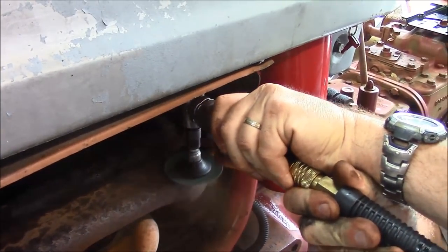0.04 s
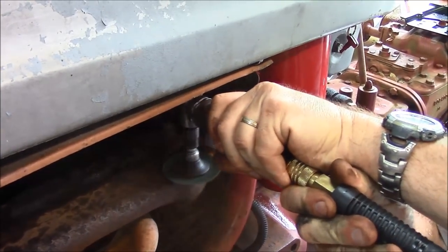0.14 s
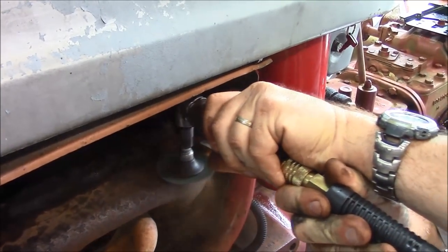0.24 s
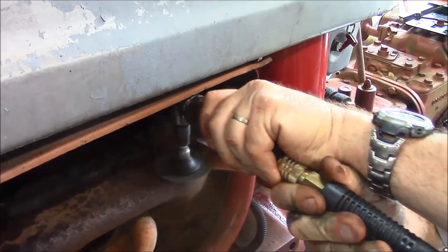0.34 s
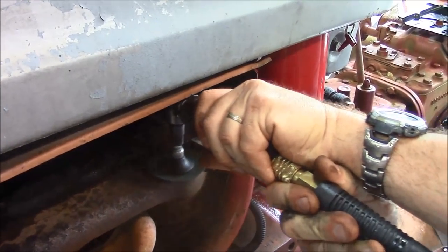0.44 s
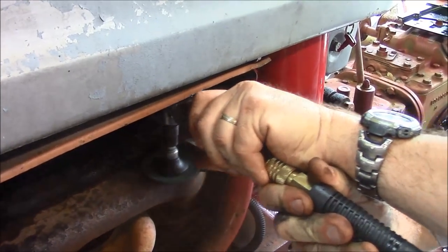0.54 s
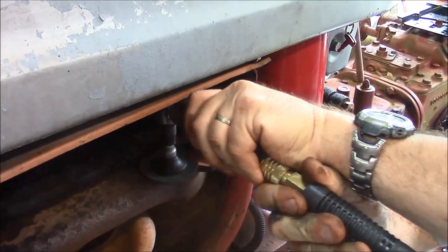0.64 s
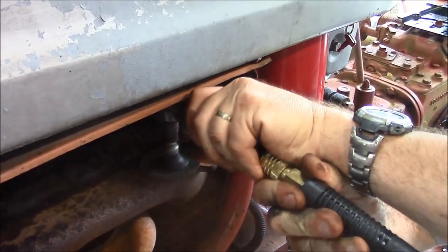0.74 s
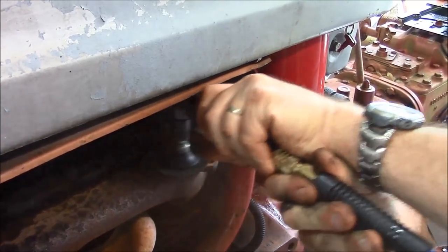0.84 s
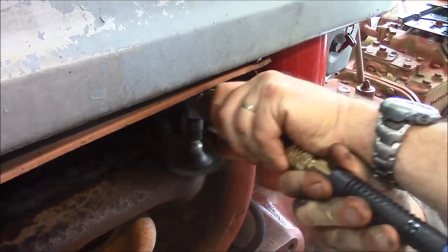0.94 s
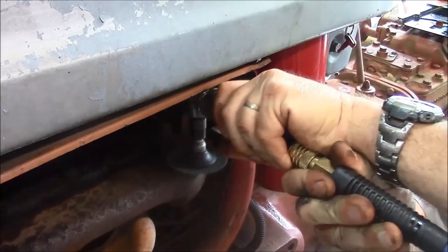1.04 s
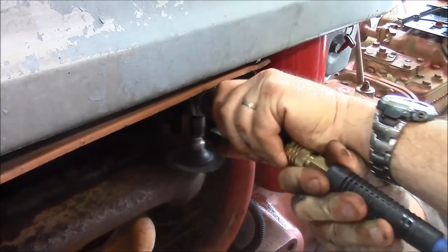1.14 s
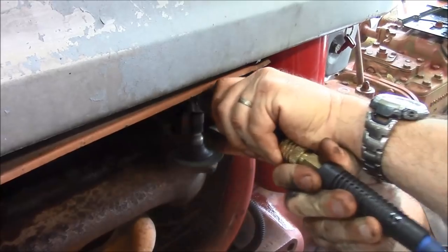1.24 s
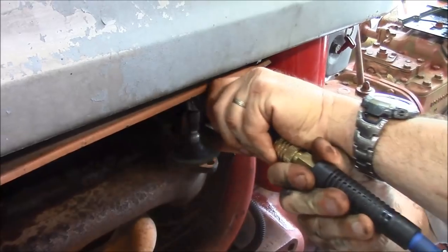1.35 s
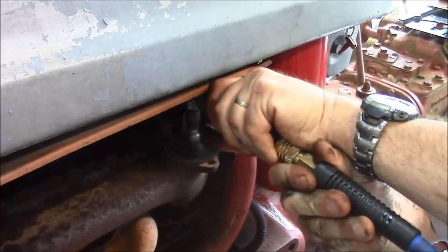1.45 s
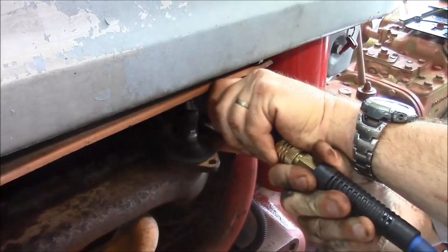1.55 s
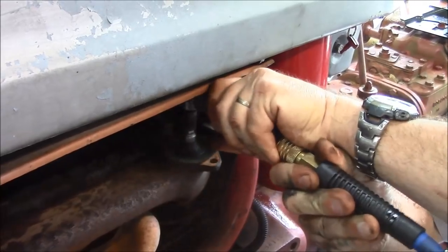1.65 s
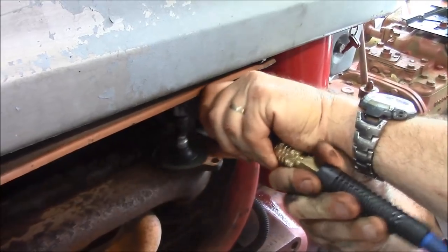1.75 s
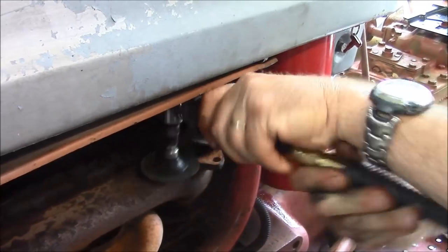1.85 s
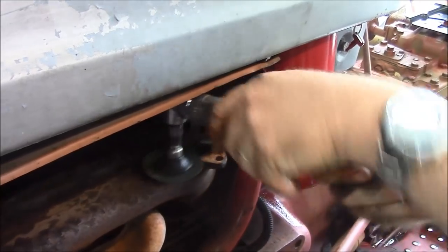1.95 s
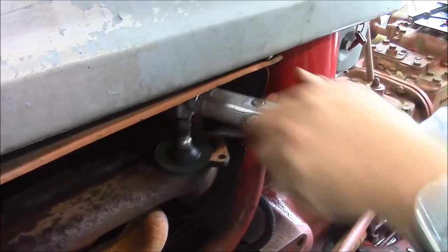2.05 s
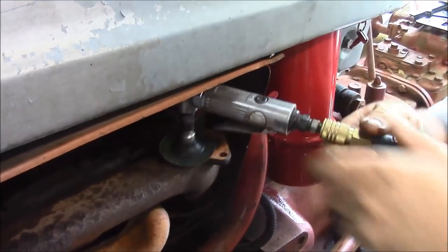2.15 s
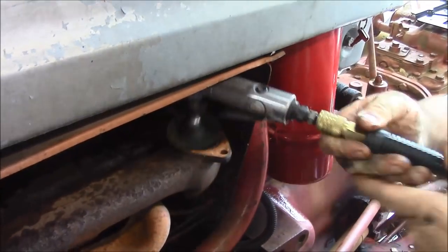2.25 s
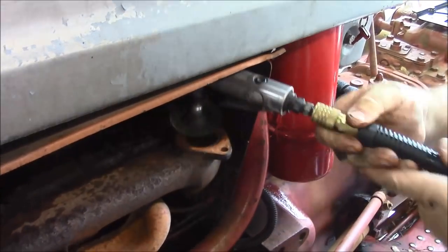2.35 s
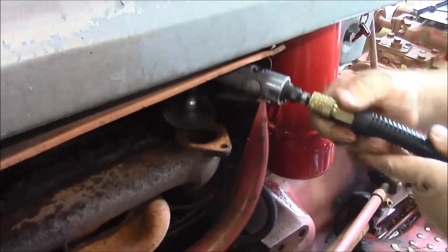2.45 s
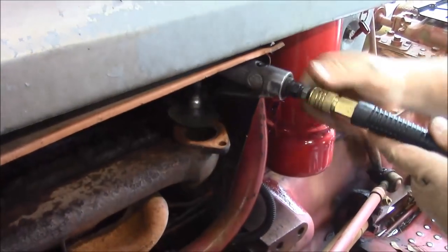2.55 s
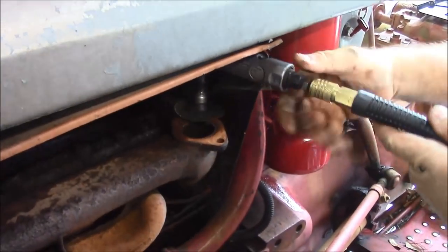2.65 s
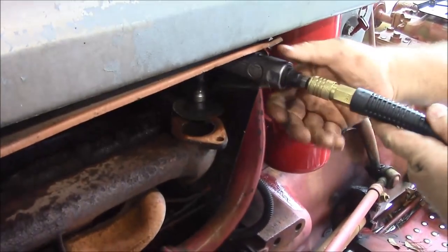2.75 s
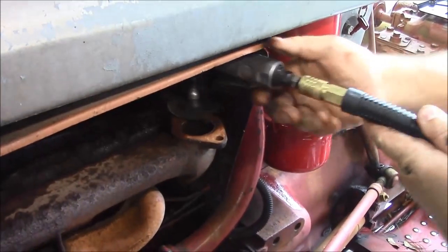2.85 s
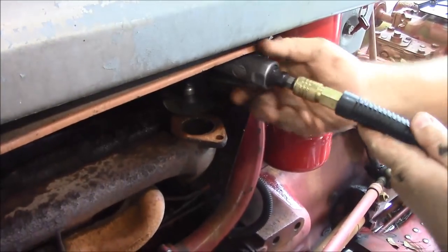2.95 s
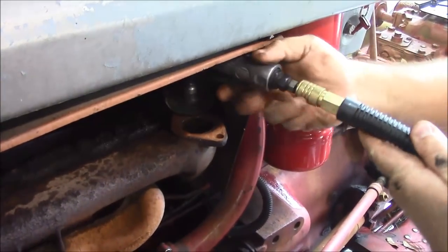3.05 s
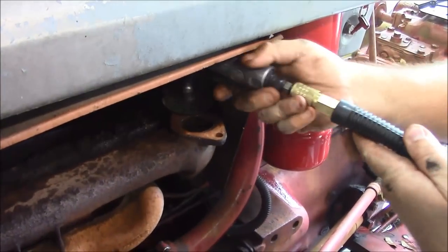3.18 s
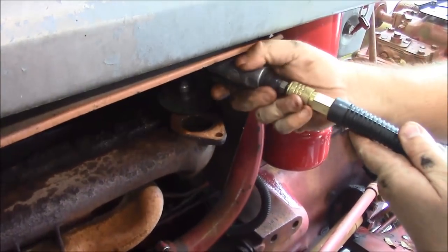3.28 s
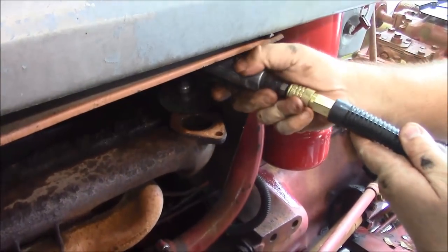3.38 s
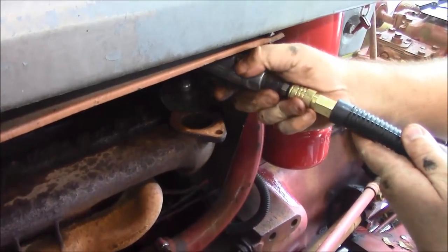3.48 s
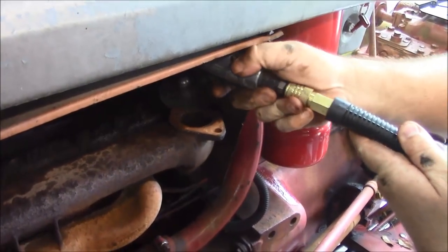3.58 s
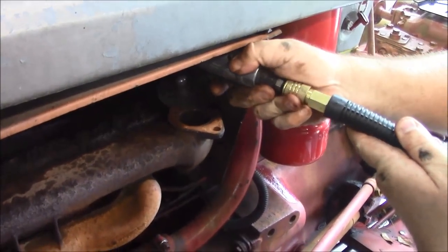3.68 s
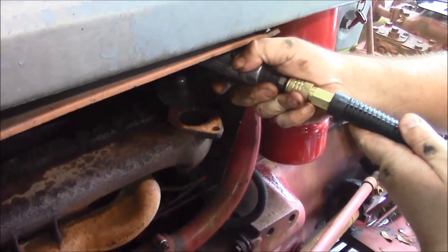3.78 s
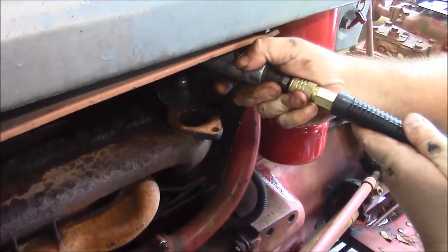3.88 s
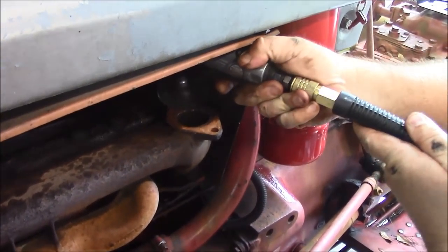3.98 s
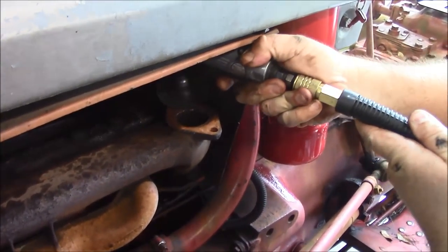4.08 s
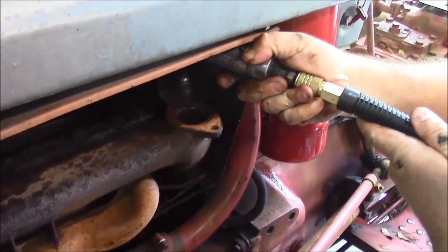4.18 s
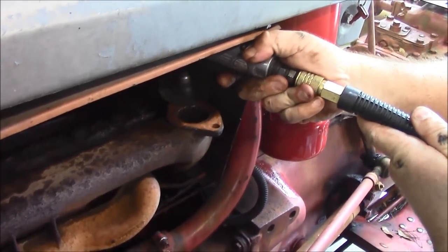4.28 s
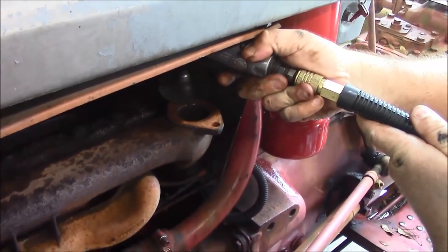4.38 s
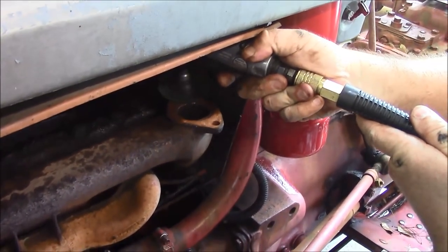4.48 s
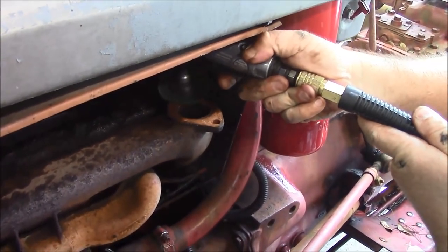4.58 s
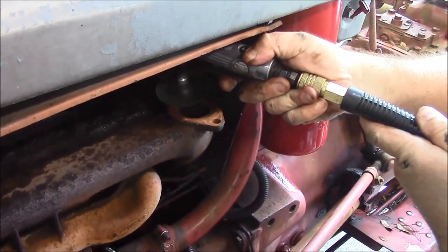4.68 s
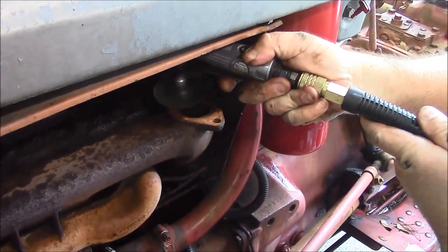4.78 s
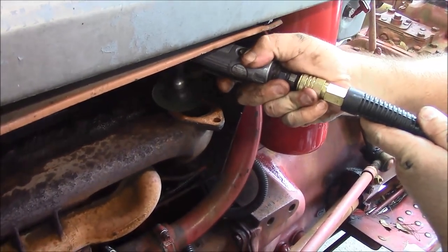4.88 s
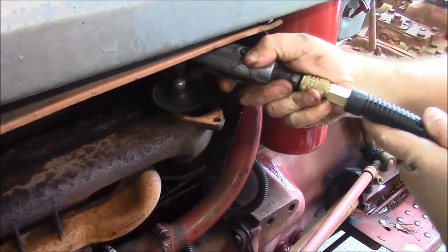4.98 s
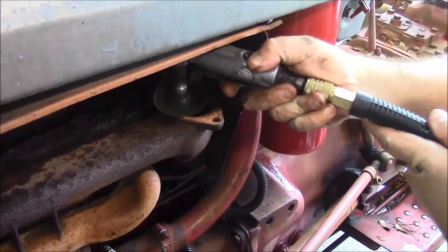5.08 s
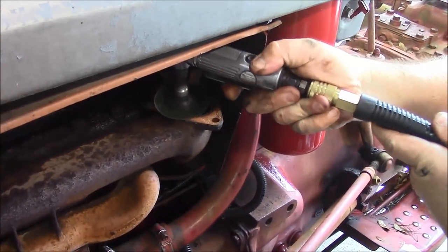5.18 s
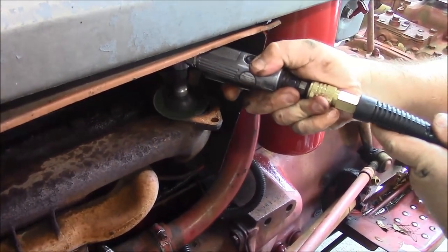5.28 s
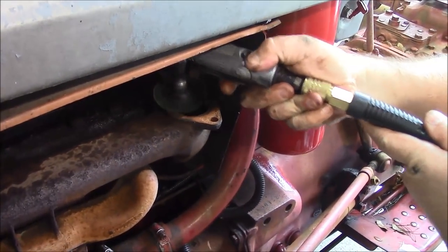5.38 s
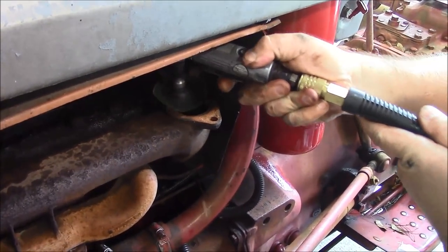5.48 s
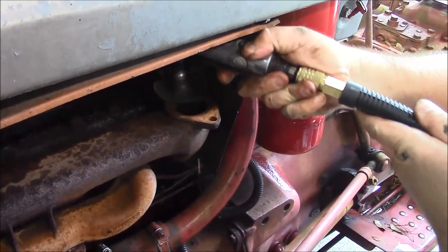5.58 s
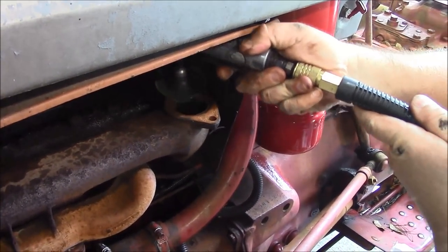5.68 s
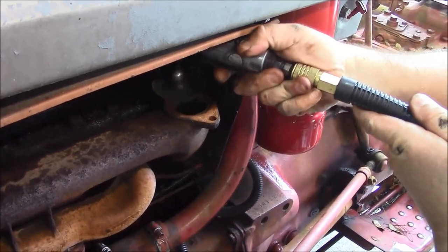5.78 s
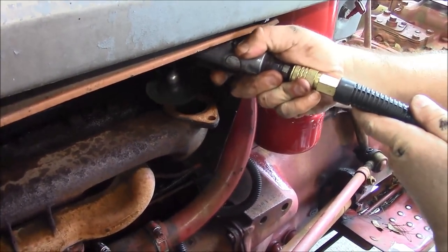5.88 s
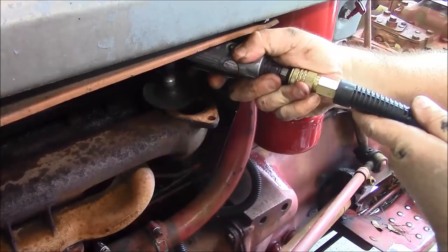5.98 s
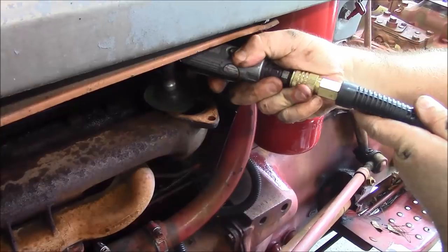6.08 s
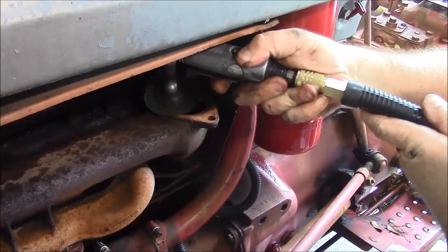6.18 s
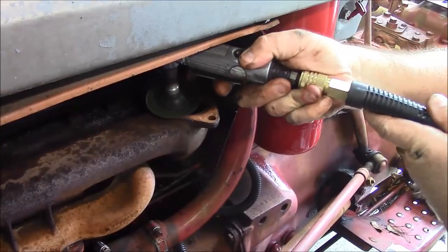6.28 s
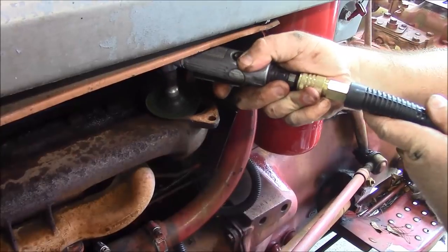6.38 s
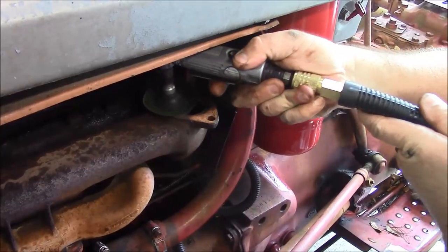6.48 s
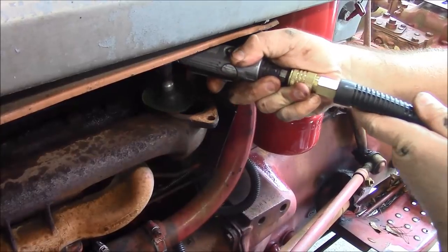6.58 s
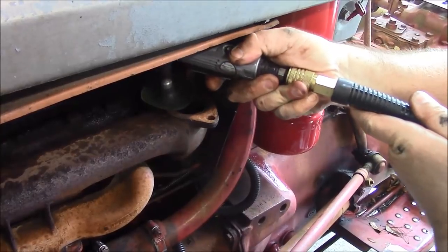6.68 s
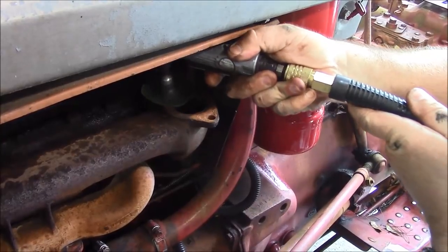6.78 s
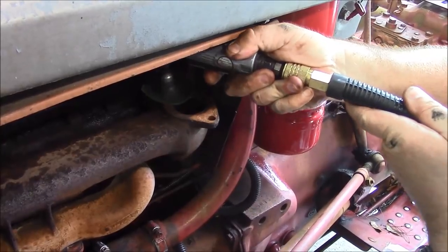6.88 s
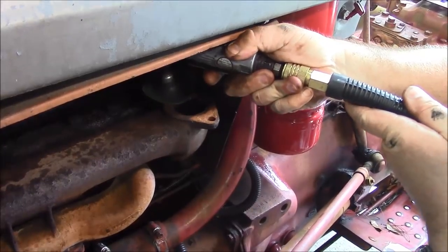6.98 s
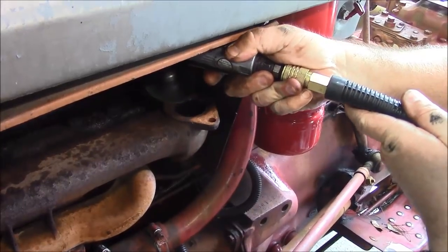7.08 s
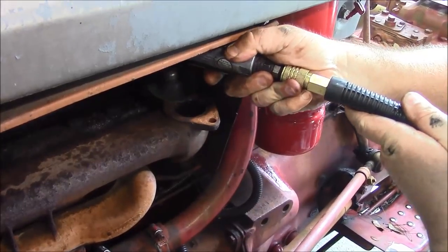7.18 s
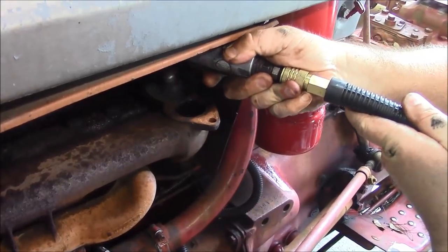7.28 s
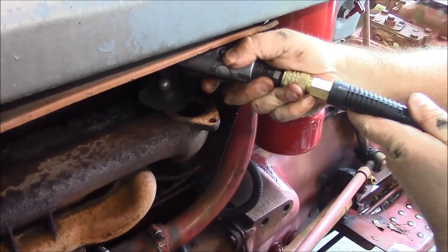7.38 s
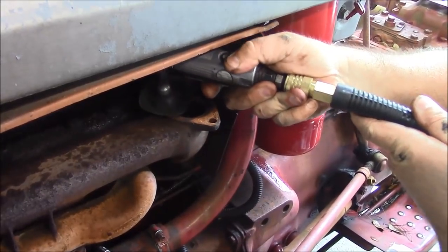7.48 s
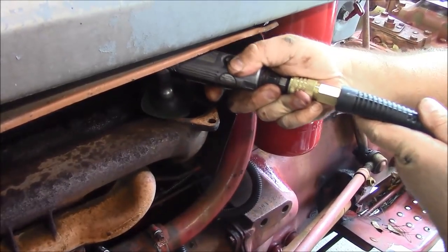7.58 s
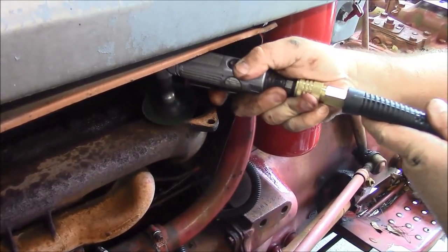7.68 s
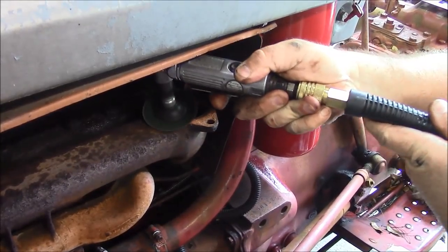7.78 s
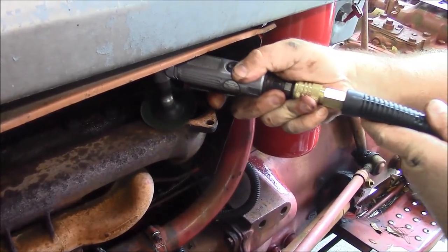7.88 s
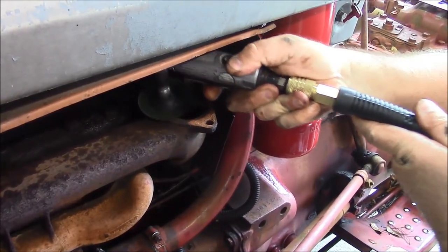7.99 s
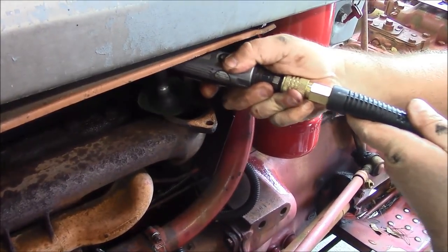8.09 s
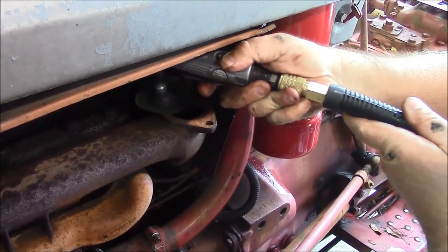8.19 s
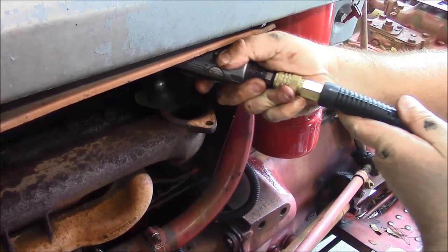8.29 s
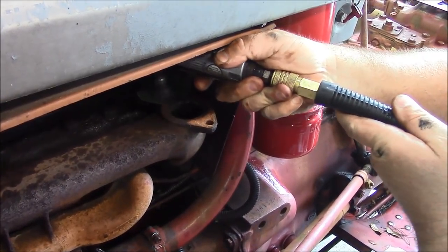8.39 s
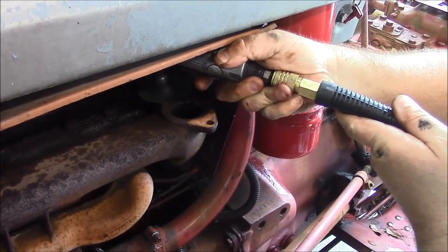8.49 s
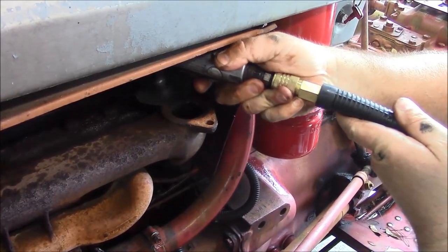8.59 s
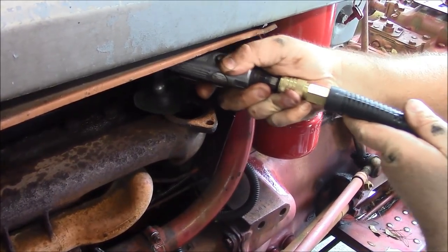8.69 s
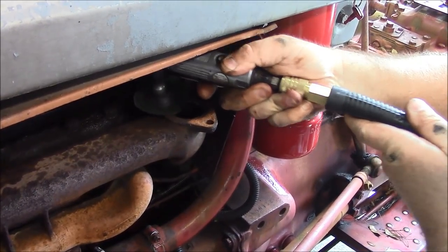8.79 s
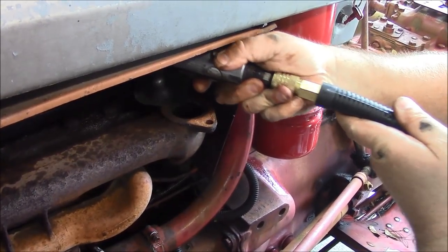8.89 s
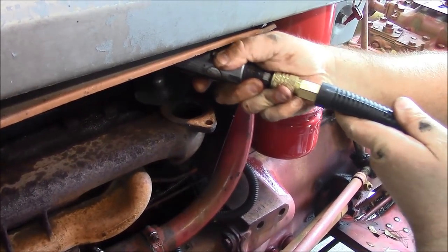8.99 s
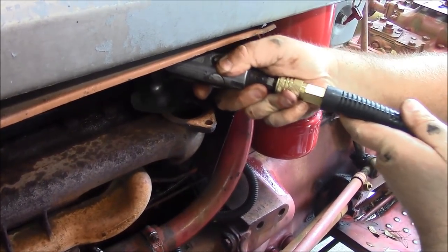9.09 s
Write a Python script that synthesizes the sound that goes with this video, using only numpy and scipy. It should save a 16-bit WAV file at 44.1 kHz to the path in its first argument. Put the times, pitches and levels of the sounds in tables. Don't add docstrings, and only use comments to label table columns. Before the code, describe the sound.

A small air grinder is already whining at the start, then shuts off and coasts down with scraping ticks. A second burst follows, fading likewise. The tool clanks against ringing metal panels while hands and hose rustle. A brief third burst leads into a long, wavering grind on iron. Close stereo microphone in a shed with short reflections.

```python
import sys
import numpy as np
from scipy import signal
from scipy.fft import rfft, irfft, next_fast_len
from scipy.io import wavfile
from scipy.ndimage import uniform_filter1d

SR = 44100
rng = np.random.default_rng(int(sys.argv[2]) if len(sys.argv) > 2 else 0)


def voltage_ratio(decibels):
    exponent = np.asarray(decibels, float) / 20
    return 10 ** exponent


def store_wav(level_fs):
    pcm = np.round(np.clip(np.atleast_2d(level_fs), -1, 1) * 32767)
    wavfile.write(sys.argv[1], SR, pcm.T.astype(np.int16))


N = 403074
GEAR = .194

# valve shuts in seconds, one bite of the disc in seconds,
# lower rub in relative dB, casting rumble in relative dB, rumble change per octave of speed in dB.
COASTS = [
    (0.144, .386, -6, -12.5, 3.5),
    (1.132, 1.428, -5.5, -11, 3),
    (4.488, 4.743, 4.5, -1.5, -4.5),
]
# start in seconds, end in seconds.
VALVE_OPEN = [
    (-.1, 0.16),
    (.549, 1.185),
    (3.8, 4.485),
    (4.815, 9.05),
]
# start in seconds, end in seconds.
HELD_FLAT = [
    (6.55, 7.7),
    (8.06, 14),
]
# start in seconds, end in seconds, vane rate it drags to in Hz,
# hum relative to the hiss in dB.
PRESSES = [(0.659, 0.664, 1314, -13), (0.774, 0.8, 1387, -11.5), (0.833, 0.892, 1370, -14),
           (0.938, 0.959, 1375, -14), (1.039, 1.134, 1424, -20), (4.269, 4.414, 1428, -27),
           (4.889, 4.954, 1441, -10.5), (5.214, 5.225, 1500, -12.5), (5.324, 5.365, 1247, -15.5),
           (5.42, 5.454, 1261, -20), (5.449, 5.534, 1370, -19.5), (5.619, 5.665, 1348, -15),
           (5.766, 5.822, 1334, -16), (5.894, 5.974, 1330, -17.5), (6.037, 6.09, 1290, -15.5),
           (6.088, 6.131, 1350, -19.5), (6.191, 6.259, 1376, -15.5), (6.331, 6.402, 1388, -15),
           (6.451, 6.542, 1345, -17.5), (6.543, 6.718, 1360, -23.5), (6.72, 7.301, 1382, -26.5),
           (7.278, 7.69, 1371, -28), (7.716, 7.751, 1413, -29), (7.749, 7.907, 1513, -29),
           (7.924, 7.976, 1371, -25.5), (8.005, 8.048, 1237, -24), (8.046, 8.605, 1362, -29),
           (8.606, 8.831, 1366, -32), (8.786, 9.3, 1353, -29.5)]
# time in seconds, hiss in dB, vane tone in dB.
RUNS = [
    [(0.0, -13.5, -16), (.125, -14.5, -17)],
    [(.55, -10.5, -10), (.6, -14, -17.5), (.7, -16, -16), (.775, -16.5, -14.5), (.92, -18, -15),
     (1.01, -23.5, -27), (1.075, -22, -22), (1.125, -25.5, -24.5)],
    [(3.88, -84, -18), (3.92, -72, -18), (3.995, -62.5, -18), (4.035, -45, -17.5), (4.06, -18, -23),
     (4.15, -16.5, -18.5), (4.465, -17.5, -16.5)],
    [(4.825, -22.5, -19), (4.835, -16.5, -21), (4.95, -15.5, -16), (5.25, -17.5, -15), (5.5, -17, -19.5),
     (5.6, -18, -18), (6.4, -17.5, -16), (6.52, -23.5, -24), (7.3, -23.5, -28.5), (7.85, -23, -26.5),
     (9.14, -23.5, -27.5)],
]
# time in seconds, rub in dB, vane tone in dB.
RUN_DOWNS = [
    [(.175, -26.5, -16.5), (.225, -14.5, -18), (.31, -15, -16), (.46, -16.5, -30), (.53, -21.5, -40),
     (.54, -30, -46)],
    [(1.19, -30, -32.5), (1.325, -34, -41.5), (1.38, -42.5, -50), (1.415, -43, -61), (1.5, -41.5, -60.5),
     (1.555, -63.5, -60), (1.65, -63, -60.5), (1.71, -81.5, -60)],
    [(4.495, -24.5, -19.5), (4.54, -32, -22.5), (4.61, -36.5, -25.5), (4.695, -42, -36.5),
     (4.725, -43, -39), (4.8, -50, -38)],
]


def evened(x):
    return x / np.sqrt(np.mean(x ** 2) + 1e-20)


def read(points, hz):
    f, value = np.transpose(points)
    return np.interp(np.log(hz + 1), np.log(f + 1), value)


def columns(tables):
    rows = np.vstack(tables)
    rows = rows[np.argsort(rows[:, 0], kind="stable")]
    return [np.interp(np.arange(N) / SR, rows[:, 0], c) for c in rows.T[1:]]


def stepped(values, starts):
    at = np.searchsorted(starts, np.arange(N) / SR).clip(1) - 1
    return np.asarray(values, float)[at].T


def inside(spans, soft_s):
    t = np.arange(N) / SR
    return np.clip(sum(np.clip(np.minimum(t - a, b - t) / soft_s + .5, 0, 1) for a, b in spans), 0, 1)


def after(s, decay_s):
    t = np.arange(N) / SR - s
    return (t >= 0) * np.exp(-np.maximum(t, 0) / decay_s)


def wander(hz):
    steps = np.arange(N) * 2 * hz / SR
    count = int(steps[-1]) + 2
    return 0.99 * np.interp(steps, np.arange(count), rng.standard_normal(count))


def noise(spectrum, lo_hz=0, hi_hz=30000):
    # pitch in Hz, side minus mid in dB.
    apart = [(60, -27), (150, -11), (380, -18.5), (950, -10.5), (2380, -16.5), (5980, -9), (9000, -11),
             (15000, -5)]
    # pitch in Hz, left minus right in dB.
    lean_db = [(60, 0.0), (240, 0.0), (950, -1.0), (4500, -1.8), (8000, .8), (15000, 0.3)]
    size = next_fast_len(N)
    hz = np.fft.rfftfreq(size, 1 / SR)
    mid, other = rfft(rng.standard_normal((2, size)))
    side = voltage_ratio(read(apart, hz)) * other
    edges = 1 / np.sqrt((1 + (lo_hz / (hz + 1)) ** 12) * (1 + (hz / hi_hz) ** 12))
    lean = voltage_ratio(read(lean_db, hz) / 2)
    both = np.array([(mid + side) * lean, (mid - side) / lean])
    return evened(irfft(both * voltage_ratio(read(spectrum, hz)) * edges, size)[:, :N])


def handling():
    # time in seconds, low level in dB, middle level in dB, high level in dB.
    rustle = [
        (1.55, -80, -76, -82),
        (2.3, -59, -65, -72.5),
        (2.5, -63, -65, -71),
        (2.75, -63, -60, -70),
        (3.0, -65.5, -70.5, -79),
        (3.4, -71, -75, -82),
        (4.0, -74, -78.5, -82),
    ]
    # pitch in Hz, level in dB.
    shed_colour = [(18, -59), (30, -25), (125, -30.5), (180, -8), (472, -5.5), (552, 2), (794, -10.5),
                   (1480, -16.5), (9640, -25), (15000, -52.5)]
    levels = columns([rustle])
    grit = [voltage_ratio(1. * wander(8)), voltage_ratio(2.2 * wander(60)), voltage_ratio(3.5 * wander(150))]
    bands = noise(shed_colour, 230, 1200), noise(shed_colour, 1200, 4500), noise(shed_colour, 4500, 14000)
    rustling = sum(voltage_ratio(db) * g * band for db, g, band in zip(levels, grit, bands))
    return rustling + voltage_ratio(-93.5) * noise(shed_colour, hi_hz=230)


def rings():
    # start in seconds, pitch in Hz, peak in dB, time to fall 60 dB in seconds.
    panels = [(1.92, 694, -50, 0.69), (1.92, 533, -55, .3), (2.035, 1001, -43, .38), (2.035, 893, -48, .3),
              (2.045, 195, -55, .4), (2.06, 577, -54, 0.63), (2.08, 450, -54, 1.2), (2.035, 1346, -50, .34),
              (2.23, 998, -46, 0.32), (2.2303, 845, -54, .8), (2.24, 200, -58, 0.66),
              (2.24, 545, -54.5, 1.2), (2.24, 400, -58, .7), (2.6148, 595, -56, 1.2),
              (2.6148, 456, -60, 1.2), (2.731, 1050, -53.5, 0.32), (2.915, 183, -63.5, 0.6),
              (2.94, 613, -59, .7), (3.1675, 183, -60, .65), (3.167, 398, -59.5, 2.5),
              (3.1675, 548, -50, 0.85), (3.1674, 948, -52, .4), (3.1675, 1233, -57.5, .4),
              (3.484, 1284, -48, .06), (3.484, 1080, -50, .06), (3.484, 1500, -47.5, .06),
              (3.514, 1350, -55, .05), (2.735, 1350, -56, .3), (2.785, 1250, -57, .2),
              (2.846, 1100, -59, .2), (2.66, 334, -62, .8), (2.38, 215, -62, .8), (2.64, 1600, -62, .5),
              (3.059, 1620, -63, 0.53)]
    t, out = np.arange(SR // 2) / SR, np.zeros(N)
    for (s, hz, db, t60), (beat_hz, phase) in zip(panels, rng.uniform(1, 5.3, (len(panels), 2))):
        at = round(s * SR)
        pair = np.sin(2 * np.pi * hz * t) + .35 * np.sin(2 * np.pi * (hz + 4 * beat_hz) * t + phase)
        swell = 1 - np.exp(-t / 0.0066)
        fade = np.cos(np.pi * t)
        out[at:at + len(t)] += voltage_ratio(db - 60 * t / t60) * swell * fade * pair
    return out


def ticks():
    # start in seconds, peak in dB, pitch in Hz.
    taps = [(1.4625, -36, 3790), (1.797, -62, 3000), (1.818, -63, 2600), (1.846, -66, 2800),
            (2.584, -42, 4200), (2.5987, -39, 2460), (2.7838, -41, 1300), (2.819, -39.5, 5780),
            (3.0081, -50.5, 1340), (3.1674, -45, 1370), (3.488, -41, 1470), (3.519, -53, 1397)]
    t, out = np.arange(1500) / SR, np.zeros(N)
    for s, db, hz in taps:
        at = round(s * SR)
        envelope = np.exp(-t / 0.0015) * np.minimum(t * hz, 1) ** 2
        tap = np.sin(2 * np.pi * hz * t) + 0.47 * np.sin(2 * np.pi * 2.3 * hz * t)
        out[at:at + len(t)] += voltage_ratio(db) * envelope * tap
    return out


def iron_bands():
    # pitch in Hz, width in Hz, level in dB.
    iron = [(184, 14, -3), (600, 84, 11.0), (915, 33, 7), (1040, 36, 3.0), (1480, 130, -2.5),
            (2166, 52, -1), (2400, 38, -1), (2910, 40, -4.5), (3360, 57, -3.0), (4450, 56, -19),
            (5830, 120, -14.5)]
    hz = np.geomspace(100, 16000, 400)
    ring = sum(voltage_ratio(db) / np.sqrt(1 + (2 * (hz - f) / w) ** 2) for f, w, db in iron) + voltage_ratio(-29.5)
    colour = np.transpose([hz, 20 * np.log10(ring)])
    return noise(colour, 190, 1600), noise(colour, 1220, 5000), noise(colour, 4500, 11500)


def knocks():
    # start in seconds, clack peak in dB, thud in dB, tick in dB, pitch of the struck spot in Hz.
    blows = [(1.92, -23.5, -44, -45, 2146), (2.013, -47, -44, -53.5, 1490), (2.035, -22, -40, -47, 905),
             (2.0876, -40, -47.5, -47, 1510), (2.1192, -48, -59, -50.5, 902), (2.139, -50, -62, -57, 921),
             (2.2305, -27.5, -40.5, -50, 1010), (2.5158, -54, -66, -56.5, 900), (2.534, -48, -68, -54, 960),
             (2.584, -44, -68, -58, 3650), (2.615, -34.5, -53, -44, 2480), (2.709, -42, -53.5, -59, 1620),
             (2.731, -36.5, -50.5, -52.5, 1080), (2.819, -51, -57, -47.5, 1016),
             (2.8459, -51, -64, -66, 1274), (2.9479, -50, -57, -57, 3490),
             (3.059, -44.5, -71.5, -65.5, 1670), (3.1456, -46.5, -59, -70, 1500),
             (3.1675, -38, -44, -76.5, 1040), (3.2838, -55.5, -56, -70, 1604),
             (3.489, -57, -63.5, -81.5, 1500), (3.6897, -62, -59.5, -78, 1046)]
    # pitch in Hz, level in dB, time to fall 60 dB in seconds.
    tool_modes = [(1670, -4, 0.31), (2304, -15, 0.57), (2850, 2.5, 0.084), (3360, -6, 0.19),
                  (5770, -10, 0.18)]
    t = np.arange(SR // 2) / SR
    thud = (1 - np.exp(-t / 0.014)) * (voltage_ratio(-60 * t / 0.34) + 0.17 * voltage_ratio(-60 * t / 1.04))
    clack = (1 - np.exp(-t / 0.00054)) * (voltage_ratio(-60 * t / 0.11) + 0.23 * voltage_ratio(-60 * t / 0.48))
    tick = voltage_ratio(-60 * t / .06) + 0.11 * voltage_ratio(-60 * t / .4)
    power, ring = np.zeros((3, N + len(t))), np.zeros(N + len(t))
    struck = rng.uniform(-1, 1, (len(blows), len(tool_modes)))
    for (s, peak_db, thud_db, tick_db, hz), where in zip(blows, struck):
        clack_db, thud_db = peak_db - 14.5, thud_db - 3
        at = round(s * SR)
        levels = voltage_ratio(np.array([[thud_db], [clack_db], [tick_db]]))
        power[:, at:at + len(t)] += (levels * [thud, clack, tick]) ** 2
        modes = sum(w * voltage_ratio(db - 60 * t / min(t60, .35)) * np.sin(2 * np.pi * f * t)
                    for w, (f, db, t60) in zip(where, tool_modes))
        spot = voltage_ratio(-60 * t / 0.098) * np.sin(2 * np.pi * hz * t)
        ring[at:at + len(t)] += voltage_ratio(clack_db) * (voltage_ratio(-5.5) * modes + voltage_ratio(3.0) * spot)
    return ring[:N] + sum(np.sqrt(p[:N]) * band for p, band in zip(power, iron_bands()))


def thrum():
    # pitch in Hz, level in dB.
    shudder_colour = [(250, -39.5), (340, -11.5), (375, 2.5), (420, -8.5), (460, -4.5), (600, -40)]
    shudder_db = [-35, -47, -46]
    decay_s = 0.14
    swell = sum(voltage_ratio(db) * (after(c[0], decay_s) - after(c[0], .3 * decay_s)) for c, db in zip(COASTS, shudder_db))
    return 2 * swell * noise(shudder_colour) * inside([(0, 1.75), (4, 4.8)], .1)


def vane_rate():
    # valve opens in seconds, shuts in seconds, free vane rate in Hz, coasting time constant
    # in seconds, rate it coasts toward in Hz.
    bursts = [
        (-.016, .145, 1580, .13, 71.94),
        (.551, 1.128, 1536, 0.126, 72.1),
        (4.054, 4.481, 1528, .12, 249.4),
        (4.82, 9.3, 1585, .15, 72),
    ]
    spin_up_s, creep_hz, settle_s, step_s = .0685, 72, .4, .002
    t = np.arange(-50, N / SR / step_s + 2) * step_s

    def gate(a, b):
        return np.clip(np.minimum(t - a, b - t) / (2 * step_s) + .5, 0, 1)

    goal, pace, air = creep_hz + 0 * t, 0 * t, 0 * t
    for opens, shuts, free_hz, coast_s, idle_hz in bursts:
        goal += gate(opens, min(shuts + settle_s, t[-1])) * (idle_hz - goal)
        pace += gate(opens, np.inf) * (1 / coast_s - pace)
        pace += gate(opens, shuts) * (1 / spin_up_s - pace)
        goal += gate(opens, shuts) * (free_hz - goal)
        air += gate(opens, shuts)
    for start, end, drag_hz, *_ in PRESSES:
        goal += gate(start, end) * (air > .5) * (drag_hz - goal)
    hz = [creep_hz]
    for pull, share in zip(goal.tolist(), (1 - np.exp(-pace * step_s)).tolist()):
        hz.append(hz[-1] + (pull - hz[-1]) * share)
    return np.interp(np.arange(N) / SR, t, hz[1:])


def disc_beat(hz):
    turns = np.cumsum(hz * GEAR) / SR
    for shut_s, bite_s, *_ in COASTS:
        turns[round(shut_s * SR):] -= turns[round(bite_s * SR)]
    bite = np.cos(2 * np.pi * turns) + .5 * np.cos(4 * np.pi * turns - .8) + 0.95 * wander(90)
    touching = 1 - .7 * inside([(1.1, 1.35), (4.4, 4.9)], .02)
    return bite * touching * np.clip(1.2 - hz / 800, .1, .85) * np.clip((hz - 120) / 70, .3, 1)


def bites(hz):
    # start in seconds, end in seconds.
    biting = [
        (.285, .545),
        (1.348, 1.53),
    ]
    between_db = [-10, -10.5]
    # time in seconds, level over the rub in dB, width in seconds.
    catches = [(0.292, 3, .003), (.3029, 1, .003), (.3147, 2, 0.0028), (0.3267, 3, 0.0028),
               (.339, 1, 0.0034), (.3529, 2, 0.0027), (.3677, 1.5, .003), (.3847, 2, 0.0038),
               (0.394, -4, 0.0026), (.4047, 2, 0.0029), (.414, -3.5, 0.0024), (.426, 3.5, 0.0043),
               (.438, -5, 0.0037), (0.45, 3, 0.005), (0.4648, -5.5, 0.0024), (0.4764, 0.1, 0.0036),
               (0.4849, 1, .004), (.502, -.5, .004), (0.514, -0.5, .004), (.522, -1.5, 0.0053),
               (0.53, -3, 0.0026), (1.358, 3, 0.0028), (1.368, -3, .003), (1.3782, 4, 0.0026),
               (1.3867, -3.5, .003), (1.4016, 4, .004), (1.4124, 1.5, .004), (1.4302, 5, 0.0043),
               (1.444, -4, 0.0025), (1.4641, 5, 0.0045), (1.4819, 2, .004), (1.4914, -1.5, 0.0036),
               (1.4998, -.5, .005), (1.511, -1.5, .005), (1.524, -3, .01)]
    t, slow = np.arange(N) / SR, inside(biting, 0.0065)
    catch = voltage_ratio(stepped(between_db, [a for a, _ in biting]))
    for s, db, width_s in catches:
        near = slice(round(s * SR) - 1500, round(s * SR) + 1500)
        catch[near] += voltage_ratio(db) * np.exp(-((t[near] - s) / width_s) ** 2)
    return (1 - slow) * voltage_ratio(6.9 * disc_beat(hz) - 2.5) + slow * catch


def colours(hz):
    linger_db = [10, 3.5, 3]
    bed_db = [.1, 0.058, .1, -2]
    linger_s = 0.037
    t = np.arange(N) / SR
    lower_db = np.full(N, -2.5)
    rumble_db = -15 + stepped(bed_db, [a for a, _ in VALVE_OPEN])
    rumble_db = rumble_db - 10 * inside([(6.6, 14)], 0.42)
    for (shut_s, _, low_db, deep_db, slope_db), hang_db, (opens, _) in zip(COASTS, linger_db, VALVE_OPEN[1:]):
        on = inside([(shut_s + 0.023, opens)], 0.02)
        hang = hang_db * np.exp(-((t - shut_s - linger_s) / linger_s) ** 2)
        lower_db += on * (low_db + hang - lower_db)
        coasting_db = deep_db + slope_db * np.log2(np.maximum(hz, 150) / 500)
        rumble_db += on * (coasting_db + hang - rumble_db)
    return lower_db, rumble_db


def hiss(hz):
    # pitch in Hz, level in dB.
    air_colour = [(1000, -47.5), (1700, -16.5), (2190, -3), (2610, -3), (2710, -3), (3000, -5),
                  (3480, -1.5), (4600, -4.5), (5640, -5.5), (6430, -11), (6990, -7), (9680, -6.5),
                  (13900, -17), (14700, -26), (15700, -42.5)]
    rub_colour = [(1000, -53.5), (1700, -27), (2090, -7), (2440, -8.5), (3080, -4), (3640, -2), (4470, -6),
                  (5750, -7), (6310, -4.5), (10600, -5), (15700, -27.5)]
    rumble_colour = [(20, -42), (150, -41.5), (290, -27.5), (375, -9.5), (410, -17.5), (460, -9),
                     (700, -11), (1200, -2), (1700, -3.5), (2200, -23.5), (4000, -83)]
    slow_rub_colour = [(1000, -50), (1800, -24), (2200, -12.5), (2600, -9.5), (3000, -2), (3600, -2.5),
                       (4200, -9.5), (4700, -6.5), (5500, -8.5)]
    grind_colour = [(2600, -30.5), (3200, -5), (3600, 0.6), (4000, -5), (4800, -30)]
    # start in seconds, end in seconds.
    crawling = [
        (.39, .6),
        (1.4, 1.43),
    ]
    high_db = columns(RUNS + RUN_DOWNS)[0]
    lower_db, rumble_db = colours(hz)
    air = inside(VALVE_OPEN, 0.017)
    chop = 1 + 0.069 * np.cos(2 * np.pi * np.cumsum(hz) / SR)
    jet = noise(air_colour, lo_hz=5360) + voltage_ratio(lower_db) * noise(air_colour, hi_hz=4860)
    jet = jet + voltage_ratio(-12) * inside(HELD_FLAT, .1) * noise(grind_colour)
    slow = inside(crawling, 0.087)
    lower = np.sqrt(1 - slow) * noise(rub_colour, hi_hz=4760)
    lower = lower + np.sqrt(slow) * voltage_ratio(1.0) * noise(slow_rub_colour, hi_hz=5200)
    rub = noise(rub_colour, lo_hz=4900) + voltage_ratio(lower_db) * lower
    rumble = voltage_ratio(rumble_db + 0.71 * wander(4.3)) * noise(rumble_colour)
    mix = np.sqrt(air) * jet * chop * voltage_ratio(.6 * wander(30))
    mix = mix + np.sqrt(1 - air) * rub * bites(hz) + rumble
    return voltage_ratio(high_db) * mix * inside([(-.1, 1.76), (3.89, 9.3)], .03)


def tone_levels(hz):
    # pitch in Hz, level in dB.
    vane_colour = [(230, -22.5), (400, -14), (550, -6), (750, -2), (950, 0), (1150, -1), (1300, -1),
                   (1500, 0)]
    octave_db = [-3, 0, -3, -5]
    edges_db = [-3, 3, 3, 1, 0, -0.7, -2, 3, -1, -3, -4.5, -1.5, -0.3, -1.5, -1.5, -4, 2.5, 3.5, 0.5, -1.5,
                0.4, 1, .1, 3, 5, 2.5, .1, 2.5, -0.5]
    hiss_db, tone_db = columns(RUNS + RUN_DOWNS)
    hum_db, tilt_db = np.full(N, -26.5), np.zeros(N)
    for (start, end, _, db), edge_db in zip(PRESSES, edges_db):
        on = inside([(start - .008, end)], .03)
        hum_db += on * (db - hum_db)
        tilt_db += on * (edge_db - tilt_db)
    bark_db = 10 * sum(after(c[0], 0.033) for c in COASTS)
    air = inside(VALVE_OPEN, 0.015)
    blown_db = hiss_db + sum(db * inside([span], .02) for db, span in zip(octave_db, VALVE_OPEN))
    blown_db = blown_db - 9.5 * np.clip((1350 - hz) / 150, 0, 1)
    upper_db = air * blown_db + (1 - air) * (tone_db - 2.5 + bark_db)
    mute_db = -22 * (1 - air) * np.clip((500 - hz) / 110, 0, 1)
    first_db = tone_db + read(vane_colour, hz) + bark_db + mute_db
    return first_db, upper_db, hiss_db + hum_db, tilt_db


def whine(hz):
    # pitch in Hz, level in dB.
    housing = [(200, -14), (500, -8), (900, -3), (1150, -14.5), (1450, 3), (1850, -7), (2400, -3.5),
               (2800, -4.5), (3100, -3.5), (3600, -4.5), (3950, -3.5), (4250, -13), (4600, 1.5),
               (5600, -1.5), (6300, -10), (8300, -1.5), (12000, -14)]
    coast_housing = [(300, -20), (500, -13), (900, -7), (1150, -15), (1450, 3), (1850, -13), (2200, -4),
                     (2750, -3), (3100, -13), (3400, -5), (3900, -6), (4200, -18), (6000, -35)]
    hum_colour = [(400, -2.5), (470, 11), (520, 2.5), (600, -3), (720, -7.5), (880, 1.8), (1150, -0.5),
                  (1700, -0.5)]
    # multiple of the vane rate, level under the 2nd harmonic in dB.
    upper_vane = [(3, -3), (4, -6), (5, -11.5), (6, -10.5), (7, -5)]
    # multiple of the disc rate, level while the disc chatters in dB, level held flat in dB.
    disc_orders = [(2, -5, 0.5), (3, -4.5, -30), (4, -4, -4.5), (6, -10, 4.5)]
    # multiple of the rotor rate, level under the vane tone in dB.
    rotor_orders = [(1, -43.5), (10, -31.5)]
    # 3rd, 4th and higher overtones in dB, extra on 3rd and 4th while spinning up in dB.
    blown_db = [(-1, -1, .1, 13, 13), (0.5, -5, 1, -1, 3), (-1, 1.5, .1, 13, 3), (.5, .5, 1, 18, 11)]
    # 2nd, 3rd, 4th and higher overtones in dB.
    coasting_db = [(.5, 1, -5, -16), (2.5, 2.5, -3, -16), (1.5, -1, 1, -18)]
    fourth_hum_db = [-4, -6, -2, .1]
    first_db, free_db, disc_db, tilt_db = (uniform_filter1d(c, size=200) for c in tone_levels(hz))
    turns = np.cumsum(hz * (1 + .0015 * wander(30))) / SR
    coasting = 1 - inside(VALVE_OPEN, .02)
    flat = inside(HELD_FLAT, 0.075)
    slowing = -np.gradient(uniform_filter1d(np.log(hz), size=900)) * SR
    load = np.clip(slowing / 0.61, -1, 1)
    disc_db = disc_db + 4.0 * load * (1 - flat)
    third, fourth, higher, *rush = stepped(blown_db, [a - .01 for a, _ in VALVE_OPEN])
    upper_hum_db = stepped(fourth_hum_db, [a for a, _ in VALVE_OPEN])
    left = stepped(coasting_db, [c[0] - .1 for c in COASTS])

    def colour(k):
        unblown = read(coast_housing, k * hz) + left[min(k, 5) - 2]
        return (1 - coasting) * read(housing, k * hz) + coasting * unblown

    rising = np.clip(np.minimum(6.8 - hz / 200, hz / 200 - 4.2), 0, 1)
    blown = [third + rush[0] * rising, fourth + rush[1] * rising, higher + 2.5 * rising]
    # multiple of the vane rate, level in dB, flutter in dB
    orders = [(1, first_db, .5), (2, free_db + colour(2), 0.75)]
    for k, db in upper_vane:
        level_db = free_db + db + (1 - coasting) * blown[min(k, 5) - 3] + colour(k)
        orders.append((k, level_db, 1.8 - 0.9 * flat))
    for k, db in rotor_orders:
        orders.append((k / 4, first_db + db - 20 * coasting, 3.))
    for k, chatter_db, flat_db in disc_orders:
        level_db = disc_db + (k > 3) * upper_hum_db + tilt_db * min(k - 2.5, 1)
        level_db = level_db + chatter_db + (flat_db - chatter_db) * flat - 25 * coasting
        orders.append((k * GEAR, level_db + read(hum_colour, k * GEAR * hz), 2.2 - 0.8 * flat))
    out = np.zeros((2, N))
    for k, level_db, flutter_db in orders:
        side = rng.uniform(-1, 1) * 0.05 * k * np.array([[1], [-1]])
        out += voltage_ratio(level_db + flutter_db * wander(12)) * np.cos(2 * np.pi * (k * turns + rng.random()) + side)
    sounding = inside([(-.1, .42), (.555, 1.36), (4.058, 4.815)], .012)
    fading = sounding * np.clip((hz - 190) / 150 + 1 - coasting, 0, 1)
    return np.sqrt(2) * out * voltage_ratio([[-.4], [.4]]) * (fading + inside([(4.82, 9.3)], 0.0046))


def shed(x):
    t = np.arange(SR // 2) / SR
    signs = rng.choice([-1., 1.], (2, len(t)))
    sparse = rng.random((2, len(t))) < .05
    taps = signs * sparse * voltage_ratio(-60 * t / 0.4) * (t > .004)
    return signal.fftconvolve(x, taps / np.linalg.norm(taps[0]), axes=1)[:, :N]


def nearby_steel(x):
    taps = np.zeros((2, 400))
    delays = rng.integers(25, 400, size=(2, 7))
    taps[[[0], [1]], delays] = voltage_ratio(-15.5) * rng.choice([-1., 1.], size=(2, 7))
    here, there = (signal.oaconvolve(x, tap[None], axes=1)[:, :N] for tap in taps)
    place = np.pi / 2 * wander(.8)
    return x + np.cos(place) * here + np.sin(place) * there


def scene():
    hz = vane_rate()
    background = handling() + rings() + ticks() + knocks() + thrum()
    tone = whine(hz)
    return background + nearby_steel(hiss(hz)) + tone + voltage_ratio(-13.5) * shed(tone)


def roll_off(x):
    return signal.sosfilt(signal.butter(12, 15850, fs=SR, output="sos"), x)


def record(dry):
    overloaded = 1.34 * np.tanh(dry / 1.36)
    loud = signal.sosfilt(signal.butter(1, 110, "high", fs=SR, output="sos"), overloaded)
    mid, side = loud.mean(0), (loud[0] - loud[1]) / 2
    side = signal.sosfilt(signal.butter(6, 120, "high", fs=SR, output="sos"), side)
    stereo = np.array([mid + side, mid - side])
    treble_limit = signal.firwin(511, 15800, window=("kaiser", 9), fs=SR)
    limited = signal.oaconvolve(stereo, treble_limit[None], "same")
    return roll_off(limited)


dry = scene()
out = record(dry)
store_wav(out)
```